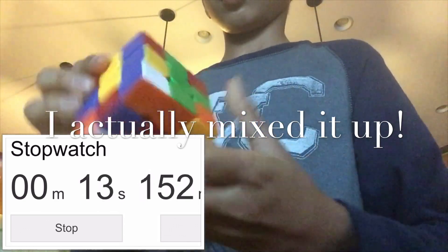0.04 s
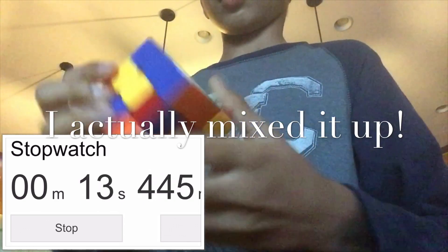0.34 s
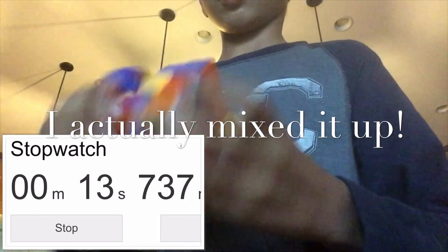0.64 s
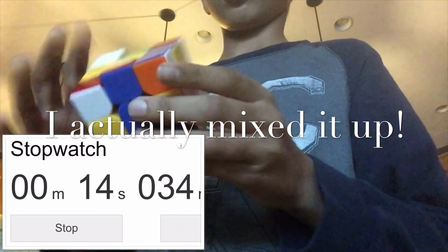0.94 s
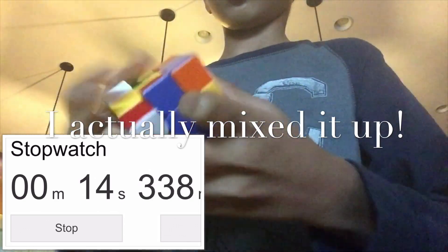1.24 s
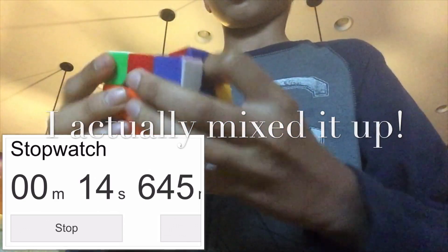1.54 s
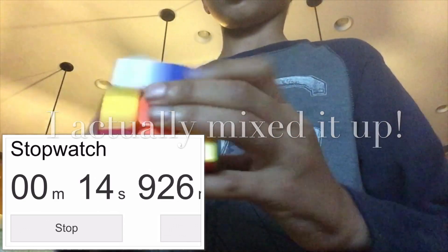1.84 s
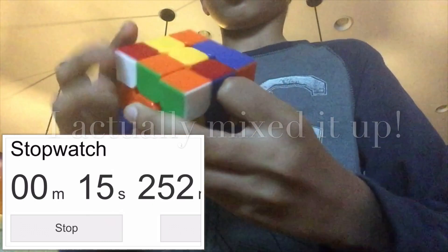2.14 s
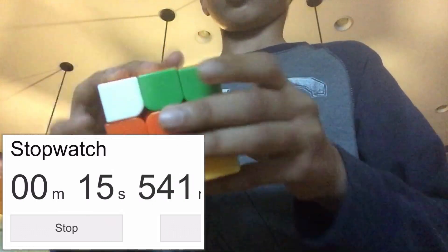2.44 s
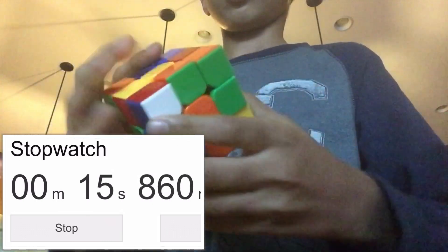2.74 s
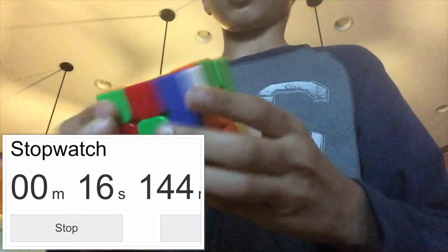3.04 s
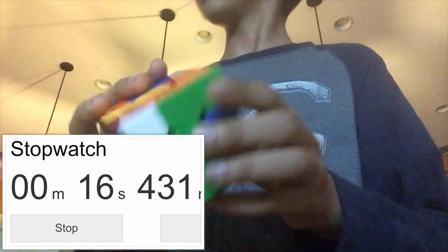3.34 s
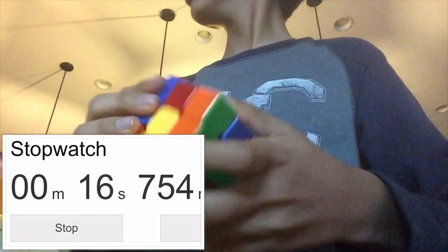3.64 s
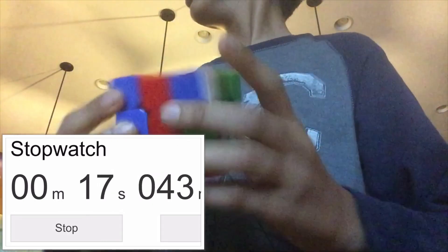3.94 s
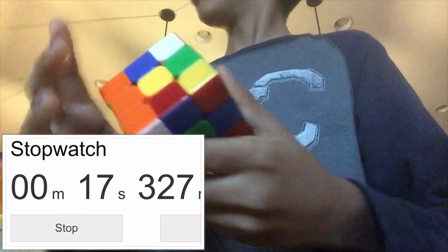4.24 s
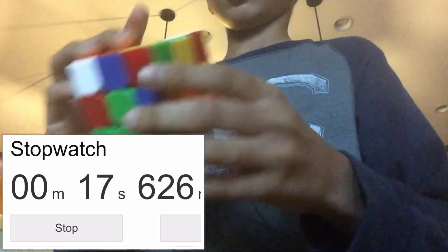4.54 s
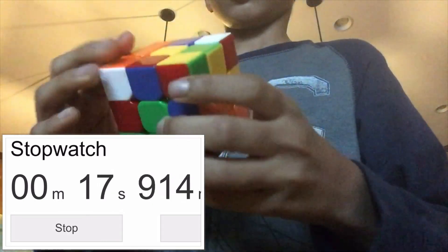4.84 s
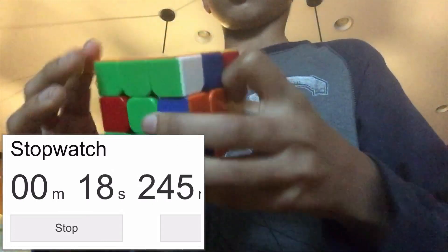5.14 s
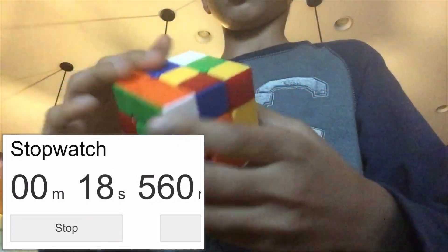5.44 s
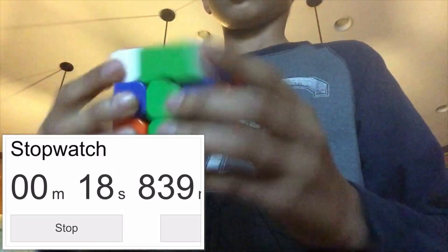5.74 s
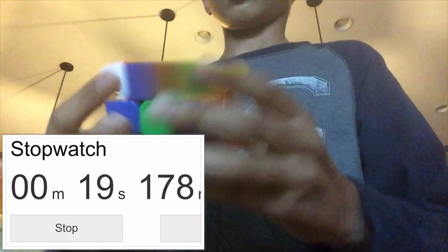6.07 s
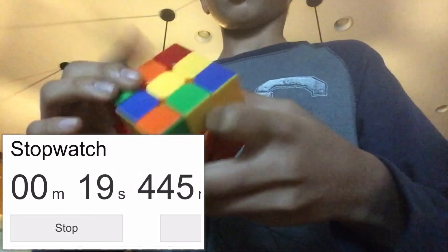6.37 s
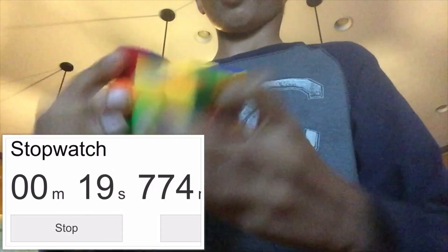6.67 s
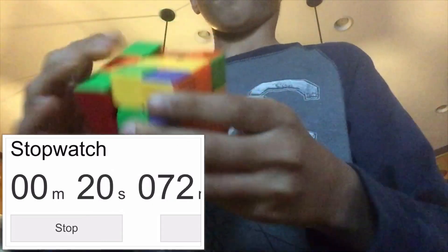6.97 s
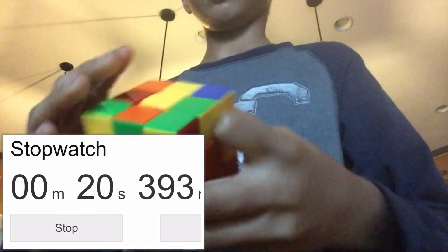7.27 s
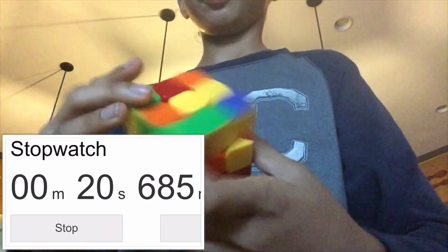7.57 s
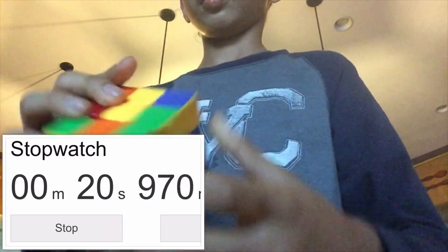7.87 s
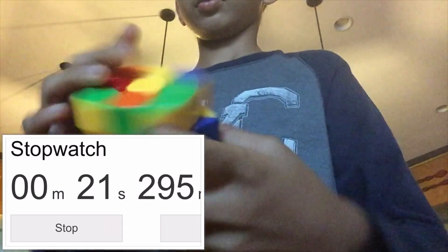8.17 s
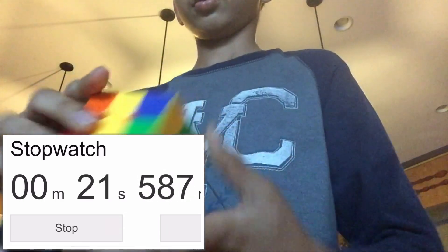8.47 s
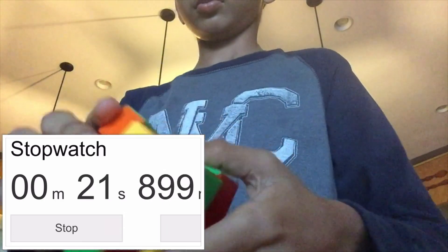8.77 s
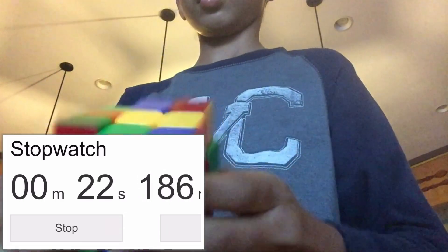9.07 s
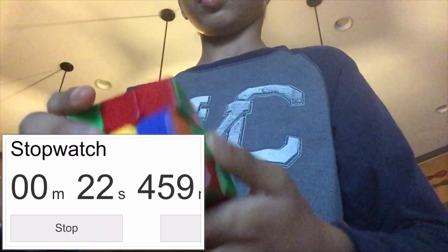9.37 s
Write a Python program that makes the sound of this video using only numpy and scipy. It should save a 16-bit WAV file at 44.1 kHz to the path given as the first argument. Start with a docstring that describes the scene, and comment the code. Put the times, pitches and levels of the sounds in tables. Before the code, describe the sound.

Hands twist a plastic puzzle cube close to a small microphone. Each turn is a brief dry scrape and a cluster of sharp clicks and hollow clacks as the pieces snap into line. The bursts come irregularly, about once a second, and crowd together past the middle, with light finger ticks between them. The bare room adds a short echo over faint rumble and hiss.

```python
"""A plastic puzzle cube, twisted in quick bursts close to a small microphone in a bare room.
In each turn the hollow pieces slide, catch on each other and snap into line. Every contact rings
their thin walls (snap) and the hollow body (clack); fingers tick on the cube between turns.
The ceiling answers first, then the room rings on over a faint rumble and hiss."""
import sys
import numpy as np
from scipy import signal
from scipy.fft import rfft, irfft, next_fast_len
from scipy.io import wavfile
from scipy.ndimage import uniform_filter1d, map_coordinates

SR = 44100
rng = np.random.default_rng(int(sys.argv[2]) if len(sys.argv) > 2 else 0)


def wav_out(sig):
    """Save sig, one row per channel (or a flat mono array), as 16-bit PCM at SR to the path in sys.argv[1]."""
    wavfile.write(sys.argv[1], SR, np.round(np.clip(np.atleast_2d(sig).T, -1, 1) * 32767).astype(np.int16))


N = 423801

# strokes of a turning layer: start_s, end_s, level_db
SLIDES = [(0.531, 0.662, -61), (0.671, 0.782, -40.5), (0.802, 0.927, -36), (1.724, 1.778, -54.5),
          (1.786, 1.805, -33), (1.839, 2.01, -47.5), (2.033, 2.079, -41.5), (3.139, 3.195, -39.5),
          (3.719, 3.854, -65), (3.896, 4.039, -49.5), (4.041, 4.136, -38), (5.086, 5.17, -49),
          (5.736, 5.819, -43), (5.826, 5.948, -45), (6.148, 6.224, -39.5), (6.39, 6.447, -34.5),
          (6.708, 6.799, -44.5), (6.805, 6.873, -36.5), (7.197, 7.268, -38.5), (7.661, 7.722, -39.5),
          (8.247, 8.303, -47.5), (8.973, 9.073, -44), (9.087, 9.204, -40.5)]
# response of the pieces' thin walls and edges: freq_hz, gain_db
WALL_SPECTRUM = [(3000, -39), (5200, -15.5), (6100, -3), (7100, 0), (8300, -7.5), (9500, -18.5),
                 (11800, -18.5), (14000, -24), (16000, -24.5)]
# response of the hollow body in the hands: freq_hz, gain_db
BODY_SPECTRUM = [(80, -39), (250, -21.5), (500, -19), (700, -12), (900, -18), (1150, -8), (1400, -8),
                 (1700, -3.5), (2800, -0.5), (3500, -6.5), (4100, -2), (5000, -11), (6500, -27),
                 (12000, -43)]


def collisions(chatter_s=0.0021, growth_per_db=0.02, log_spread=0.19):
    """All knocks; harder ones chatter longer. Rows: start_s, snap_db, clack_db, base_length_s, ring_hz."""
    # prominent clicks of pieces meeting: start_s, snap_db, clack_db
    main_clicks = [(0.0953, -43, -46), (0.2752, -28.5, -41), (0.383, -42.5, -55), (0.4128, -42, -56),
                   (0.4282, -38.5, -41), (0.5435, -31.5, -42), (0.5742, -56, -45), (0.6504, -49, -62),
                   (0.672, -41, -45), (0.6924, -43, -33.5), (0.7053, -36, -29), (0.7615, -18.5, -27.5),
                   (0.7749, -30.5, -31.5), (0.8364, -13, -22.5), (0.86, -6, -15.5), (0.8802, -17, -26),
                   (0.9168, -20.5, -28), (1.1059, -49, -47), (1.1969, -37, -38), (1.229, -48.5, -51),
                   (1.2956, -42.5, -45), (1.3814, -51, -55.5), (1.5409, -44.5, -54.5), (1.625, -37.5, -44),
                   (1.6821, -30.5, -33.5), (1.7447, -26, -26), (1.7706, -18.5, -33), (1.7764, -11.5, -30),
                   (1.7857, -10.5, -17.5), (1.794, -12.5, -24), (1.8037, -14.5, -29), (1.8719, -19, -21.5),
                   (1.9112, -28, -38.5), (1.9383, -17.5, -19.5), (1.9683, -17, -29), (1.9959, -9, -24),
                   (2.0745, -16.5, -30), (2.0902, -22.5, -25), (2.3813, -40, -49), (2.4986, -47.5, -53.5),
                   (2.567, -52.5, -49.5), (2.587, -50.5, -46.5), (2.779, -42, -45.5), (3.0212, -45, -45),
                   (3.1139, -31, -37), (3.1473, -25, -26), (3.1755, -18.5, -26), (3.1856, -19.5, -28),
                   (3.4139, -46.5, -60), (3.4688, -48, -47), (3.6877, -43, -49), (3.7394, -44, -41),
                   (3.8373, -41.5, -28.5), (3.912, -40, -40.5), (3.961, -29, -30), (3.9908, -33, -45.5),
                   (4.0759, -20, -25.5), (4.0996, -7, -11.5), (4.1153, -18.5, -25.5), (4.394, -32, -46.5),
                   (4.5815, -32, -49), (4.5891, -29, -39.5), (4.6267, -30, -40.5), (4.6966, -41, -47),
                   (4.8233, -40, -50.5), (4.86, -48, -63.5), (4.8723, -53, -62), (5.018, -54, -47.5),
                   (5.0703, -48.5, -50.5), (5.101, -28.5, -33.5), (5.1445, -31, -44), (5.187, -46, -44.5),
                   (5.2932, -32, -50), (5.3236, -41.5, -53), (5.4234, -44, -51.5), (5.5627, -40, -46),
                   (5.5876, -29, -33), (5.622, -45.5, -41), (5.7609, -17.5, -24.5), (5.7842, -25, -29),
                   (5.8698, -24, -22.5), (5.8827, -19, -30), (5.8971, -6.5, -10.5), (5.9199, -22.5, -25),
                   (5.9632, -26.5, -29.5), (5.97, -19, -26.5), (6.1555, -15.5, -22), (6.1788, -13.5, -19),
                   (6.2071, -9, -16.5), (6.3985, -7.5, -17.5), (6.4331, -23, -33.5), (6.561, -39, -40),
                   (6.6964, -40, -46), (6.774, -23.5, -32.5), (6.7943, -22.5, -31.5), (6.8224, -18, -19),
                   (6.84, -17.5, -37), (6.8579, -17, -20.5), (6.9433, -30, -31.5), (6.9508, -38, -38),
                   (7.1671, -36, -34), (7.2133, -20, -24), (7.236, -15, -35), (7.2624, -23.5, -28.5),
                   (7.4317, -46, -51), (7.5844, -38.5, -40), (7.59, -33.5, -49), (7.6632, -31, -34),
                   (7.6806, -21, -41), (7.6997, -19, -23.5), (7.7596, -40, -47.5), (8.0982, -48, -55),
                   (8.1656, -39.5, -62), (8.2516, -32.5, -31), (8.2842, -30, -39), (8.4183, -44, -48),
                   (8.502, -48.5, -43), (8.6054, -29.5, -39.5), (8.6098, -30.5, -46), (8.6655, -42, -46.5),
                   (8.7927, -54, -47), (8.942, -44.5, -43), (8.9951, -22, -25.5), (9.0399, -25, -27.5),
                   (9.0819, -30.5, -27.5), (9.116, -13, -20.5), (9.175, -29, -28), (9.1879, -13, -17),
                   (9.1953, -22, -32)]
    # main resonances of the pieces: ring_hz
    piece_hz = [2180, 2800, 3073, 3000, 4260]
    hits = np.vstack([catches(), touches(), main_clicks])
    length_s = chatter_s * np.exp(growth_per_db * hits[:, 1] + log_spread * rng.standard_normal(len(hits)))
    return np.column_stack([hits, length_s, rng.choice(piece_hz, len(hits))])


def contacts(hits):
    """Each contact rings the thin walls and the hollow body."""
    out = np.zeros(N + SR)
    walls = piece_responses(hits, WALL_SPECTRUM, ripple_step_hz=451, peak_db=-19.5, width_hz=400)
    hollows = piece_responses(hits, BODY_SPECTRUM, ripple_step_hz=275, peak_db=7, width_hz=420)
    snaps = amp(-1) * strike(hits, walls, stretch=1.21, first_blow=1.1, grain_db=-0.5)
    clacks = amp(-1.24) * strike(hits, hollows, stretch=0.54, first_blow=1.6, grain_db=2.5)
    for (start_s, snap_db, clack_db, *_), snap, clack in zip(hits, snaps, clacks):
        out[round(start_s * SR):][:len(snap)] += amp(snap_db) * snap + amp(clack_db) * clack
    return out[:N]


def piece_responses(hits, spectrum, ripple_step_hz, peak_db, width_hz, ripple_db=3.5, blend_db=-31):
    """Gain in dB per struck piece: the cube's colour, one main resonance, uneven lesser ones."""
    size = 2048
    hz = np.fft.rfftfreq(size, 1 / SR)
    clack_db, ring_hz = hits[:, 2:3], hits[:, 4:]
    knots = rng.standard_normal((len(hits), size // 8))
    ripple = np.array([map_coordinates(row, [hz / ripple_step_hz], mode="mirror") for row in knots])
    resonance = 1 + amp(peak_db) / np.hypot(1, 2 * (hz - ring_hz) / width_hz) ** 1.7
    # a light tap rings one piece clearly; a hard snap blends many
    clarity = 0.38 + 1 / (1 + amp(clack_db - blend_db))
    return along(spectrum, hz) + clarity * (ripple_db * ripple + 20 * np.log10(resonance))


def strike(hits, gains_db, stretch, first_blow, grain_db, size=1024):
    """One click per contact: a first blow, then loose pieces chatter. Energy: 1 ms at rms 1."""
    length_s = np.maximum(hits[:, 3:4], 1 / SR) * stretch
    t = np.arange(size) / SR
    draws = rng.standard_normal((len(length_s), 2, size))
    envelope = np.exp(-(t / length_s) ** 1.03) * (1 - np.exp(-12 * t / length_s))
    chatter = draws[:, 0] * amp(grain_db * draws[:, 1]) * envelope
    chatter /= np.linalg.norm(chatter, axis=1, keepdims=True)
    chatter[:, SR // 5000] += first_blow * np.exp(-length_s[:, 0] / 0.0024)  # short contact: clean blow
    clicks = ring(chatter, gains_db)
    return clicks / np.linalg.norm(clicks, axis=1, keepdims=True) * np.sqrt(SR / 1000)


def ring(forces, gains_db):
    """Each row of forces drives its own minimum-phase resonant body."""
    cepstrum = irfft(np.log(amp(gains_db)))
    size = cepstrum.shape[1]
    cepstrum[:, 1:size // 2] *= 2
    cepstrum[:, size // 2 + 1:] = 0
    return irfft(rfft(forces, size) * np.exp(rfft(cepstrum)))


def scuffs(hits, lead_s, trail_s, gain_db):
    """Pieces scuff just before they meet and settle just after."""
    t = np.arange(-SR // 20, SR // 20) / SR
    envelope = np.exp(np.where(t < 0, t / lead_s, -t / trail_s))
    force = np.zeros(N + SR)
    for start_s, snap_db, clack_db, *_ in hits:
        strength = np.hypot(amp(snap_db), amp(clack_db)) ** 0.87
        force[round(start_s * SR):][:len(t)] += strength * envelope
    friction = through_cube(grains(rate_hz=5100, spread_db=3.5), body_db=-1.5)
    return amp(gain_db) * force[SR // 20:][:N] * friction


def sliding(grip_rate_hz=260, grip_depth_db=6.7):
    """A turning layer rasps over the others, swelling and easing; its grip comes and goes."""
    t, pressure = np.arange(N) / SR, np.zeros(N)
    for start_s, end_s, level_db in SLIDES:
        progress = np.clip((t - start_s) / (end_s - start_s), 0, 1)
        pressure += amp(level_db) * np.sqrt(4 * progress * (1 - progress))
    grip = map_coordinates(rng.standard_normal(N // 100), [t * grip_rate_hz], mode="mirror")
    friction = grains(rate_hz=5000, spread_db=7) * amp(grip_depth_db * grip)
    return pressure * through_cube(friction, body_db=-3)


def catches(count=6, snap_db=-38.5, clack_db=-39, usual_slide_db=-42.5, edge_db=-5, spread_db=2.5):
    """Sliding pieces catch, harder mid-stroke and under more push. Rows: start_s, snap_db, clack_db."""
    start_s, end_s, slide_db = np.transpose(SLIDES)[:, :, None]
    progress = (np.arange(count) + rng.random((len(SLIDES), count))) / count
    force_db = 0.3 * (slide_db - usual_slide_db) + edge_db * (2 * progress - 1) ** 2
    force_db += spread_db * rng.standard_normal(progress.shape)
    catch_s = start_s + (end_s - start_s) * progress
    return np.stack([catch_s, snap_db + force_db, clack_db + force_db], axis=-1).reshape(-1, 3)


def jolts(centre_hz, t60_s):
    """A layer stopping hard jolts the whole cube: a low thud, damped at once by the hands."""
    # hard stops: start_s, level_db
    stops = [(0.862, -43), (4.102, -43.5), (5.899, -44.5), (6.208, -48), (7.261, -44.5), (7.696, -42.5),
             (9.192, -48.5)]
    out, t = np.zeros(N + SR), np.arange(SR // 10) / SR
    for (start_s, level_db), detune in zip(stops, rng.standard_normal(len(stops))):
        pitch_hz = centre_hz * np.exp(0.32 * detune)
        thud = amp(level_db - 60 * t / t60_s) * np.sin(2 * np.pi * pitch_hz * t)
        out[round(start_s * SR):][:len(t)] += thud
    return out[:N]


def touches(count=30, snap_db=-56.5, clack_db=-57.5, spread_db=4):
    """Fingers brush the cube as the grip shifts. Rows: start_s, snap_db, clack_db."""
    start_s = (np.arange(count) + rng.random(count)) / count * N / SR
    force_db = spread_db * rng.standard_normal(count)
    return np.column_stack([start_s, snap_db + force_db, clack_db + force_db])


def handling(level_db):
    """Loose pieces rustle faintly under the fingers throughout."""
    return amp(level_db) * through_cube(grains(rate_hz=400, spread_db=3), body_db=-1.5)


def grains(rate_hz, spread_db):
    """Tiny catches of plastic on plastic: random impulses of uneven size."""
    impulses = (rng.random(N) < rate_hz / SR) * rng.choice([-1, 1], N)
    return impulses * amp(spread_db * np.clip(rng.standard_normal(N), -2, 2))


def through_cube(friction, body_db):
    """Friction heard through both walls and body, at rms 1."""
    def response(hz):
        return np.hypot(amp(along(WALL_SPECTRUM, hz)), amp(body_db + along(BODY_SPECTRUM, hz)))
    return unit(filtered(friction, response))


def room(x, tail_db, ceiling_db, ceiling_delay_s, patchy_db, size=256):
    """Sound leaving in all directions mixes into a diffuse tail, led by the ceiling reflection."""
    # reverberation time: freq_hz, t60_s
    decay_times = [(200, 0.5), (800, 0.63), (2500, 0.64), (7000, 0.5547), (10000, 0.49), (15000, 0.41)]
    # colour of the tail: freq_hz, gain_db
    colour = [(200, 1), (900, -2), (1150, -0.5), (1800, -3.5), (3500, -0.5), (5200, 2), (6100, 2),
              (7200, 1), (10000, -5.5), (15000, -2.5)]
    frames = dict(fs=SR, nperseg=size, noverlap=size - size // 4)
    hz, t, spectra = signal.stft(x, **frames)
    power = uniform_filter1d(abs(spectra) ** 2, size=7, axis=0)  # directions average out the ripple
    age_s = t[t < 1]
    ceiling = amp(ceiling_db * np.exp(-abs(age_s - ceiling_delay_s) / 0.03))
    arrival = np.minimum(age_s / ceiling_delay_s, 1) * ceiling
    decay = amp(along(colour, hz)[:, None] - 60 * age_s / along(decay_times, hz)[:, None])
    fade = (arrival * decay) ** 2
    stored = abs(signal.fftconvolve(power, fade / fade.sum(axis=1).mean(), axes=1))[:, :len(t)]
    diffuse = signal.stft(rng.standard_normal(N), **frames)[2]
    # echoes reinforce and cancel in narrow, passing patches
    patches = unit(uniform_filter1d(rng.standard_normal(spectra.shape), size=45, axis=1))
    diffuse *= amp(patchy_db * patches)
    tail = diffuse * np.sqrt(stored / np.mean(abs(diffuse) ** 2))
    return amp(tail_db) * signal.istft(tail, **frames)[1][:N]


def background(level_db):
    """Steady room rumble and microphone hiss."""
    # noise floor: freq_hz, relative_density_db
    spectrum = [(15, -42), (25, -11.5), (87, 0), (134, -0.5), (394, -6.5), (489, -11), (1100, -19.5),
                (1330, -16), (2410, -23.5), (2990, -24.5), (4870, -29), (7110, -28.5), (10100, -32.5),
                (12200, -29), (16000, -34)]
    return amp(level_db) * unit(filtered(rng.standard_normal(N), lambda hz: amp(along(spectrum, hz))))


def amp(db):
    """Decibels to gain."""
    return 10 ** (np.asarray(db) / 20)


def unit(x):
    """x at rms 1."""
    return x / np.sqrt(np.mean(x ** 2) + 1e-20)


def along(points, hz):
    """Interpolate (freq_hz, value) points on a log frequency axis."""
    freq_hz, values = np.transpose(points)
    return np.interp(np.log(hz + 1), np.log(freq_hz + 1), values)


def filtered(x, response):
    """Zero-phase filter with gain response(hz)."""
    size = next_fast_len(N + SR // 2)
    return irfft(rfft(x, size) * response(np.fft.rfftfreq(size, 1 / SR)), size)[:N]


def scene():
    """Cube, reverberation and noise floor, mono."""
    hits = collisions()
    cube = contacts(hits) + jolts(centre_hz=310, t60_s=0.042) + sliding() + handling(level_db=-76.5)
    cube += scuffs(hits, lead_s=0.003, trail_s=0.0045, gain_db=-21)
    reverb = room(cube, tail_db=-14, ceiling_db=5, ceiling_delay_s=0.0079, patchy_db=3)
    return (cube + reverb + background(level_db=-67))[None]


def record(dry):
    """Small microphone: loses the deepest bass, rounds the hardest peaks, limits the band."""
    low_hz, top_hz, peak_limit = 33, 16050, 0.9
    sound = filtered(dry[0], lambda hz: hz ** 4 / (hz ** 4 + low_hz ** 4))
    sound = sound / (1 + (sound / peak_limit) ** 8) ** (1 / 8)
    return filtered(sound, lambda hz: 1 / (1 + (hz / top_hz) ** 160))[None]


dry = scene()
out = record(dry)
wav_out(out)
```